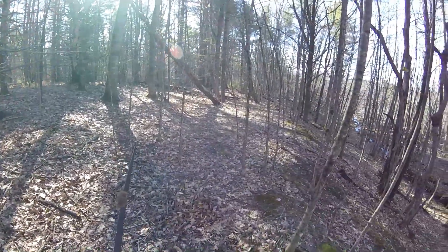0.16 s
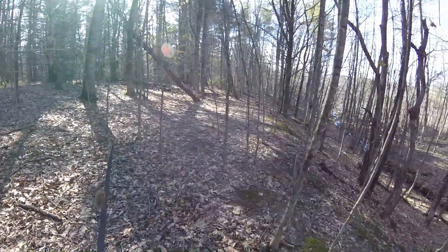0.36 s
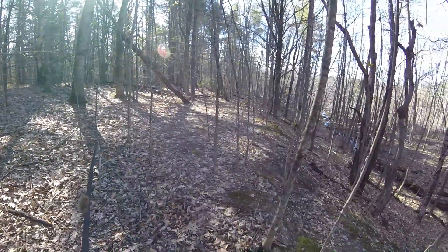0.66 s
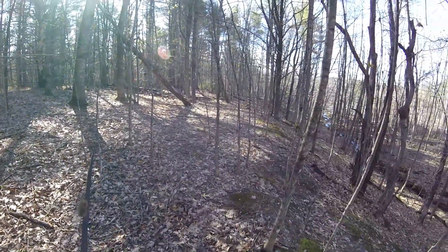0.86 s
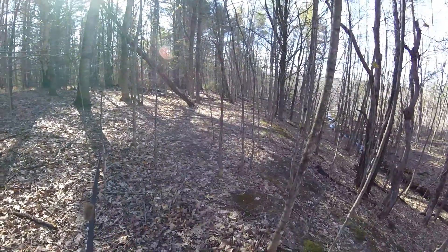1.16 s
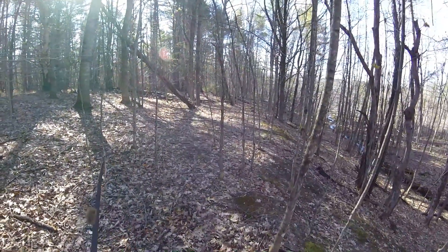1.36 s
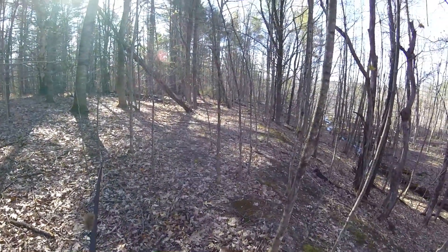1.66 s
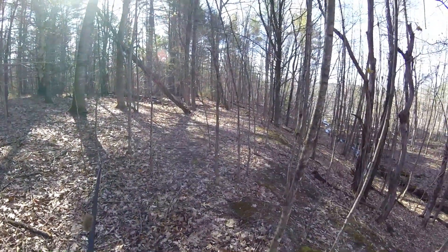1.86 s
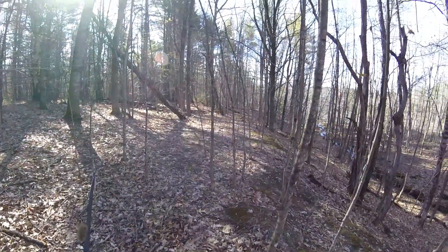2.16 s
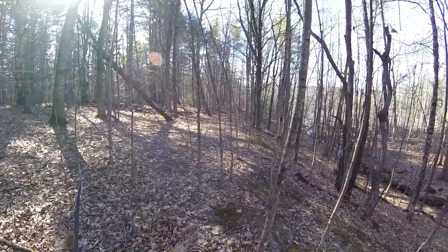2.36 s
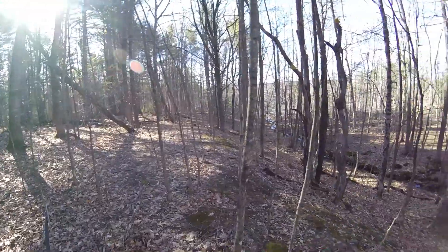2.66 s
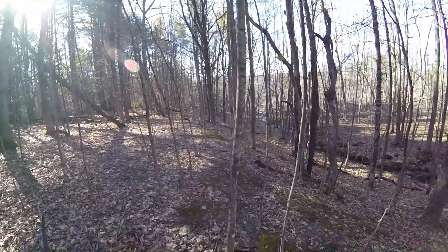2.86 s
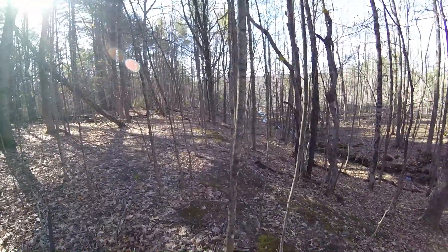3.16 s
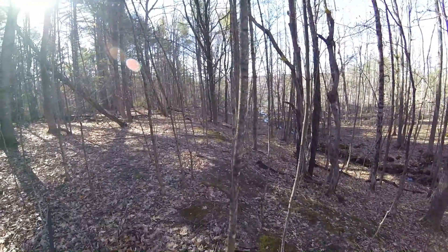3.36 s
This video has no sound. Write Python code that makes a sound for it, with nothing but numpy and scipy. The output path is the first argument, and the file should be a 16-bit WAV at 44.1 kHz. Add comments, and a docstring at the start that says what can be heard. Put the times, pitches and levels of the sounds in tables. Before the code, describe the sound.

Close, raspy turkey yelps come in a fast, even run over faint woodland rustle.

```python
"""A turkey yelps eleven times, close by, in bare spring woods.
Each yelp is a raspy, pulsing buzz that rings in the bird's throat while its pitch slides and breaks.
A click comes before the first two yelps, a faint tone follows three, and the trees send back a soft echo.
Under it lie a faint rustle of the woods, a far hum and wind rumbling on the microphone."""
import sys
import numpy as np
from scipy import signal
from scipy.fft import rfft, irfft
from scipy.io import wavfile
from scipy.ndimage import uniform_filter1d

SR = 44100
rng = np.random.default_rng(int(sys.argv[2]) if len(sys.argv) > 2 else 0)


def transcribe(u):
    """Save the signal u as a 16-bit wav file named by the first command-line argument.

    u: samples, shape (n,) or (channels, n), limited to [-1, 1]; the rate is SR.
    q: integer samples, one column per channel.
    """
    v = np.clip(np.atleast_2d(u).T, -1, 1)
    q = np.round(v * 32767).astype(np.int16)
    wavfile.write(sys.argv[1], SR, q)


N = 154350
TIME_S = np.arange(N) / SR
TOP_HZ = 16480


def from_db(db):
    return 10 ** (np.asarray(db) / 20)


def unit_level(x):
    return x / np.sqrt(np.mean(x ** 2) + 1e-20)


def drift(rate_hz):
    """A smooth random wobble, about 1 in size."""
    pole = np.exp(-2 * np.pi * rate_hz / SR)
    return unit_level(signal.lfilter([1], [1, -2 * pole, pole * pole], rng.standard_normal(N + SR))[SR:])


def coloured(x, curve, rings=()):
    """Shape a sound with a tone curve; each ring boosts one narrow band."""
    size = 2 ** 13
    hz = np.maximum(np.arange(size // 2 + 1) * SR / size, 5)
    curve_hz, curve_db = np.transpose(curve)
    db = np.interp(np.log(hz), np.log(curve_hz), curve_db)
    for centre, width, boost in rings:
        db = db + boost / (1 + (2 * (hz - centre) / width) ** 2)
    fold = irfft(db * np.log(10) / 20)   # folded so that ringing follows a sound, never leads it
    fold[1:size // 2] *= 2
    fold[size // 2 + 1:] = 0
    return signal.fftconvolve(x, irfft(np.exp(rfft(fold))))[:len(x)]


def only(x, hz, band, order=4):
    """Let only the low, high or in-between part of a sound through."""
    return signal.sosfilt(signal.butter(order, hz, band, fs=SR, output="sos"), x)


# Tone of the rustle: pitch_hz, gain_db
RUSTLE_TONE = [(150, -6.5), (550, -12), (1100, -10), (4100, -20.5), (5300, -17), (9000, -26),
               (16000, -46.5)]
# Its extra band of hiss: pitch_hz, width_hz, boost_db
RUSTLE_HISS = [(6900, 730, 5)]

def rustle():
    """The woods rustle: faint noise that flickers a little."""
    noise = only(coloured(rng.standard_normal(N), RUSTLE_TONE, RUSTLE_HISS), 140, "high")
    return from_db(-61 + 0.71 * drift(17)) * unit_level(noise)


# Tones of the hum: pitch_hz, level_db
HUM_TONES = [(69, -66), (748, -71.5)]

def hum():
    """Two far tones waver in loudness."""
    return sum(np.sqrt(2) * from_db(db + 2.5 * drift(4.3)) * np.sin(2 * np.pi * hz * TIME_S)
               for hz, db in HUM_TONES)


# Strength of the wind: time_s, level_db
WIND_LEVELS = [(0, -51), (2.55, -63), (2.8, -58), (3.5, -56)]
# Tone of the wind: pitch_hz, gain_db
WIND_TONE = [(30, 3.1), (75, 0), (200, -17.5)]

def wind():
    """Wind on the microphone makes a low, lumpy rumble."""
    rumble = unit_level(only(coloured(rng.standard_normal(N), WIND_TONE), 150, "low"))
    level_db = np.interp(TIME_S, *np.transpose(WIND_LEVELS))
    return from_db(level_db + 1.9 * drift(7.7)) * rumble


# Clicks before a yelp: start_s, peak_db (before lows and highs are trimmed)
CLICKS = [(0.018, -23), (.312, -10.5)]

def clicks(fade_s=0.0056):
    """Tiny puffs of air click through the throat."""
    out, t = np.zeros(N), np.arange(2000) / SR
    for start_s, peak_db in CLICKS:
        puff = throat(rng.standard_normal(len(t)) * from_db(-60 * t / fade_s))
        out[int(start_s * SR):][:len(t)] += from_db(peak_db) * puff / np.abs(puff).max()
    return only(only(out, 1162, "high"), 6600, "low")


# Tone of the throat: pitch_hz, gain_db
THROAT_TONE = [(800, -2.5), (1300, 1), (2450, -6), (4300, -16), (6200, -3.5), (7400, -20), (9200, -30),
               (9800, -31.5), (10800, -32), (11900, -56), (13600, -39.5), (16300, -54.5)]
# Where the throat rings: pitch_hz, width_hz, boost_db
RINGS = [(1835, 170, 9), (3130, 200, 7.5), (8900, 350, 10.5)]

def throat(x, *extra_rings):
    """The throat colours whatever passes through it and rings at a few pitches."""
    return coloured(x, THROAT_TONE, [*RINGS, *extra_rings])


# One list of moments per yelp: time_s, pitch_hz, level_db, roughness (0 smooth, 1 raspy)
YELP_PATHS = [
    [(0.0422, 805, -29, 0), (0.048, 797, -15.5, 0), (0.066, 767, -11.5, 0.25), (0.072, 907, -14.5, 0.08),
     (0.08, 882, -13.5, 0.05), (0.088, 789, -15, 0.08), (0.1, 710, -18, 0.05), (0.11, 623, -21, 0.04),
     (0.118, 563, -23.5, 0.07), (0.126, 595, -70, 0.1)],
    [(0.3275, 747, -20.5, 0.47), (0.333, 943, -17.5, 0.09), (0.34, 925.6, -11.5, 0.01),
     (0.35, 897, -9.5, 0.11), (0.358, 804, -19, 0), (0.368, 719, -14.5, 0.2), (0.378, 602, -21, 0),
     (0.396, 582, -28.5, 0.02), (0.406, 586, -49, 0.39)],
    [(0.5625, 880, -16.5, 0.4), (0.568, 919.4, -19.5, 0.69), (0.574, 630, -11.5, 0.9),
     (0.586, 646, -14.5, 0.26), (0.61, 775.4, -16.5, 0.4), (0.616, 878.6, -18.5, 0.34),
     (0.626, 929, -23, 0), (0.636, 868, -46, 0.42)],
    [(0.8045, 909.6, -25.5, 0.31), (0.812, 908, -10, 0.3), (0.818, 758, -13.5, 0.09),
     (0.826, 707, -10.5, 0.19), (0.836, 627.2, -18, 0.15), (0.846, 640.8, -20, 0.71),
     (0.851, 883.4, -11.5, 0.28), (0.86, 900.6, -25, 0.18), (0.868, 827, -50, 0.52)],
    [(1.0605, 958.6, -6.5, 0.45), (1.066, 895, -17, 0.64), (1.072, 793.5, -9, 0.93),
     (1.079, 787.5, -20.5, 0.1), (1.082, 926, -17, 0.35), (1.09, 907.6, -16.5, 0.18),
     (1.1, 933, -17.5, 0.09), (1.107, 1022, -28, 0.14)],
    [(1.2735, 820.4, -23, 0.38), (1.281, 807, -15, 0.39), (1.286, 903.2, -12, 0.42),
     (1.293, 844.3, -15, 0.18), (1.299, 726.3, -9.5, 0.34), (1.308, 767, -18.5, 0.4),
     (1.318, 645.3, -18, 0.77), (1.328, 765, -16.5, 0.67), (1.337, 644.4, -45, 0.51)],
    [(1.5265, 797, -13, 0.86), (1.532, 868, -12, 0.21), (1.55, 914.6, -16, 0.44), (1.555, 869, -18.5, 0.14),
     (1.566, 860, -20.5, 0.32), (1.58, 816.5, -28, 0.24), (1.589, 900, -47.5, 0.36)],
    [(1.7365, 793.4, -28, 0), (1.746, 804, -12.5, 0.21), (1.753, 772.3, -15, 0.62),
     (1.758, 914.6, -14.5, 0), (1.766, 839, -13.5, 0.23), (1.78, 678.5, -16, 0.34),
     (1.799, 629.3, -19, 0.38), (1.81, 631.5, -47, 0.6)],
    [(1.9805, 906.6, -22.5, 0), (1.985, 983.3, -18.5, 0.16), (1.998, 884, -14, 0.22),
     (2.004, 779, -14.5, 0.03), (2.012, 847.6, -13.5, 0), (2.022, 923.7, -14.5, 0.12),
     (2.035, 890, -18, 0.35), (2.044, 1002, -23.5, 0.04), (2.052, 1076, -43, 0.28)],
    [(2.2165, 897.5, -19.5, 0.25), (2.223, 808, -15, 0.31), (2.231, 731.5, -15.5, 0.2),
     (2.236, 845, -15, 0.57), (2.24, 737, -15.5, 0.56), (2.247, 873, -14.5, 0.48),
     (2.254, 700.4, -17.5, 0.69), (2.264, 620, -24.5, 0.7), (2.275, 620, -36.5, 0.52)],
    [(2.4435, 901, -18, 0.43), (2.449, 870, -13.5, 0.08), (2.456, 743.3, -18, 0.37),
     (2.468, 643, -15, 0.41), (2.487, 636, -16.5, 0.48), (2.495, 632, -42, 0.56)],
]

def yelps(attack_s=0.0021, release_s=0.0029, sink_s=0.017, low_cut_hz=581):
    """The turkey's buzz rings its throat, with a low puff under the rough stretches."""
    time_s, _, level_db, roughness = np.concatenate(YELP_PATHS).T
    rough = np.interp(TIME_S, time_s, roughness)
    starts, ends = np.array([(path[0][0], path[-1][0]) for path in YELP_PATHS]).T
    which_yelp = np.maximum(np.searchsorted(starts, TIME_S) - 1, 0)
    age_s = np.maximum(TIME_S - starts[which_yelp], 0)
    source = buzz(*notes(YELP_PATHS), rough, which_yelp, age_s)
    # One high ring of the throat sinks as each yelp begins.
    early, late = (throat(source, (hz, 320, 6)) for hz in (7000, 5770))
    sunk = np.minimum(age_s / sink_s, 1)
    voice = only((1 - sunk) * early + sunk * late, low_cut_hz, "high", order=8)
    voice /= np.sqrt(uniform_filter1d(voice ** 2, size=300) + 1e-6)   # even out the level
    fades = sum(np.clip(np.minimum((TIME_S - start) / attack_s, (end - TIME_S) / release_s + 1), 0, 1)
                for start, end in zip(starts, ends))
    loudness = from_db(np.interp(TIME_S, time_s, level_db)) * fades
    low_air = only(rng.standard_normal(N), [400 / np.sqrt(2), 400 * np.sqrt(2)], "band", order=2)
    puff = from_db(-33.5) * unit_level(low_air) * np.sqrt(rough) * sunk
    return only(voice * loudness, low_cut_hz, "high") + puff * uniform_filter1d(loudness, size=300)


def notes(paths, break_ratio=1.09, linger_s=0.011, sag_hz_per_s=5800):
    """Two sides of the voice take turns at each upward jump; the old note briefly hangs on and sags."""
    pitch, share, side = np.zeros((2, N)), np.zeros((2, N)), 0
    for path in paths:
        time_s, hz = np.transpose(path)[:2]
        breaks = np.flatnonzero(hz[1:] > break_ratio * hz[:-1])
        for first, last in zip([-1, *breaks], [*breaks, len(time_s) - 1]):
            start = time_s[max(first, 0)]
            past_s = np.maximum(TIME_S - time_s[last], 0)
            rise = 1 if first < 0 else (TIME_S - start) / (time_s[first + 1] - start)
            on = (TIME_S >= start) & (past_s < linger_s)
            slide = np.interp(TIME_S, time_s[first + 1:last + 1], hz[first + 1:last + 1])
            pitch[side, on] = (slide - sag_hz_per_s * past_s)[on]
            share[side, on] = np.clip(np.minimum(rise, 1 - past_s / linger_s), 0, 1)[on]
            side = 1 - side
    return pitch, share


# Strength of the two lowest tones, one row per yelp: first_db, second_db
LOW_TONES = [(-7, 2.5), (-0.5, 3), (4, 3.5), (-0.4, -2), (7, 1.5), (-2, -2.8), (5, 3), (-3.5, -2.5),
             (0.2, -0.5), (4, -0.5), (0, -0.7)]

def buzz(pitch, share, rough, which_yelp, age_s, waver_hz=75.6, dulling_db_per_s=61, rasp_db=7.5):
    """Tones at 1, 2, 3... times the pitch make a buzz; roughness shakes them and adds puffs of air."""
    first_db, second_db = np.transpose(LOW_TONES)[:, which_yelp]
    upper_db = -dulling_db_per_s * age_s
    shaky_pitch = pitch * (1 + 0.04454 * rough * drift(162))
    phase = 2 * np.pi * np.cumsum(shaky_pitch, axis=1) / SR
    shake, tones = np.sqrt(rough), 0
    for k in range(1, 29):   # each tone swells and slips on its own, high ones more
        swell_db = 3.5 * np.sqrt(min(k, 6)) * shake * drift(waver_hz)
        gain = from_db(swell_db + (first_db, second_db, upper_db)[min(k, 3) - 1])
        slip = np.sqrt(k * (rough + 0.05 * (k / 10) ** 4)) * drift(waver_hz)
        tones += gain * np.sum(share * (k * pitch < TOP_HZ) * np.cos(k * phase + slip), axis=0)
    puffs = rng.standard_normal(N) * np.sum(share * (1 + np.cos(phase)), axis=0)
    return tones + from_db(rasp_db + upper_db) * shake * puffs


def echo(x, fade_s, delay_s):
    """Sound scatters off many trunks, dying away by 60 dB in fade_s."""
    t = np.arange(SR) / SR
    scatter = rng.standard_normal(SR) * from_db(-60 * t / fade_s) * (t > delay_s)
    scatter = only(scatter, 8600, "low", order=1)
    return signal.fftconvolve(x, scatter / np.linalg.norm(scatter))[:N]


# Faint tones after a yelp: start_s, pitch_hz, peak_db
AFTER_TONES = [(1.812, 1000, -40), (2.052, 1100, -47), (2.5, 1070, -37)]

def after_tones(length_s=0.019, waver_hz=75.6):
    """Short, unsteady tones swell and fade."""
    out, slip = np.zeros(N), drift(waver_hz)
    for start_s, hz, peak_db in AFTER_TONES:
        swell = np.sin(np.pi * np.clip((TIME_S - start_s) / length_s, 0, 1))
        out += from_db(peak_db) * swell * np.sin(2 * np.pi * hz * TIME_S + slip)
    return out


def scene():
    """The turkey and its echoes over the quiet background, in one channel."""
    turkey = yelps() + clicks() + after_tones()
    near = from_db(-18) * echo(turkey, fade_s=0.076, delay_s=0.0012)   # ground and nearest trunks
    far = from_db(-34) * echo(turkey, fade_s=0.49, delay_s=0.031)
    return (turkey + near + far + rustle() + hum() + wind())[None]


def record(dry):
    """Cut away the very highest treble."""
    return signal.sosfilt(signal.cheby2(12, 70, TOP_HZ, fs=SR, output="sos"), dry)


dry = scene()
out = record(dry)
transcribe(out)
```